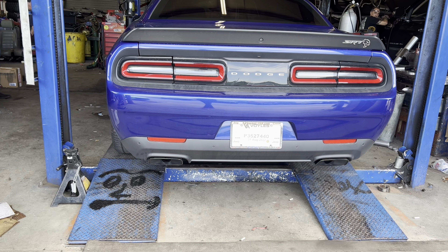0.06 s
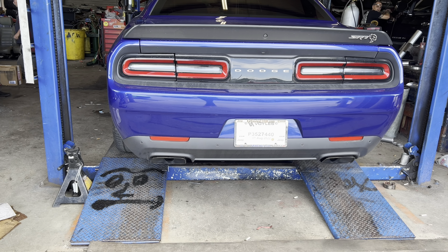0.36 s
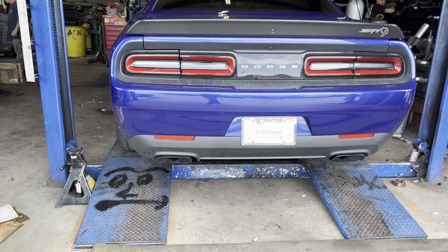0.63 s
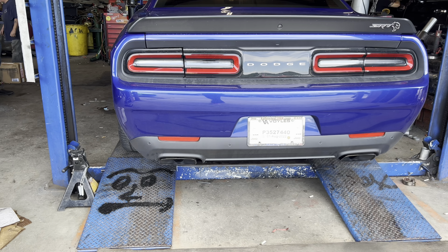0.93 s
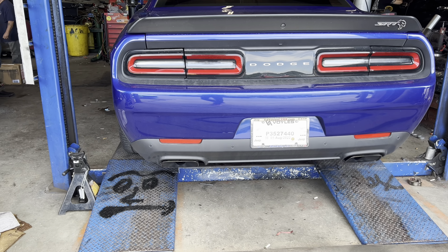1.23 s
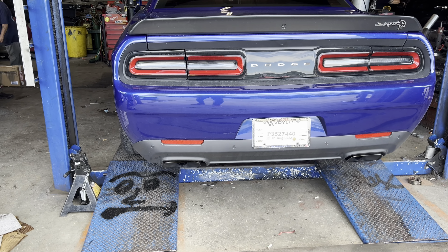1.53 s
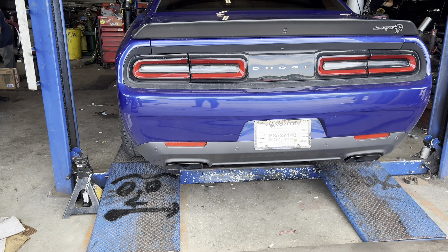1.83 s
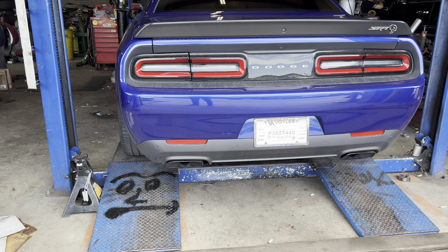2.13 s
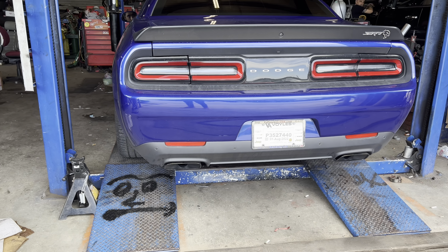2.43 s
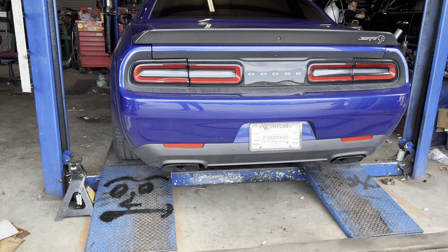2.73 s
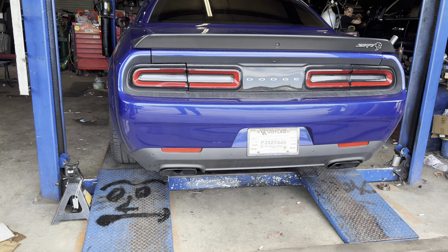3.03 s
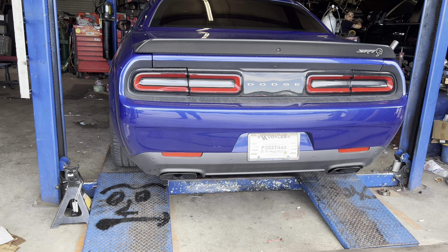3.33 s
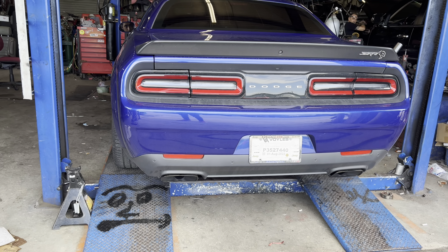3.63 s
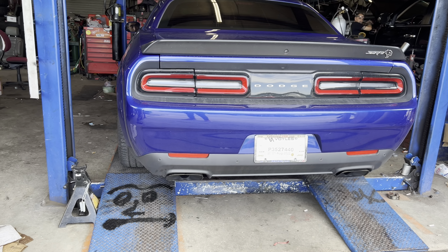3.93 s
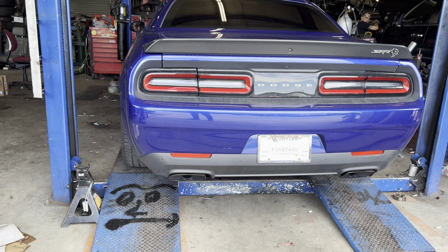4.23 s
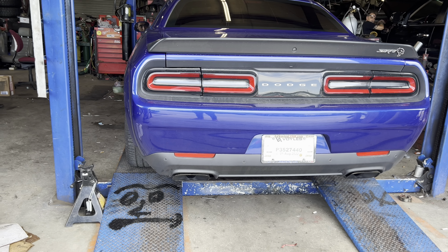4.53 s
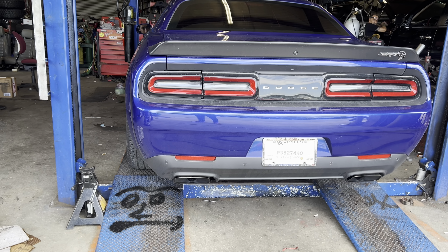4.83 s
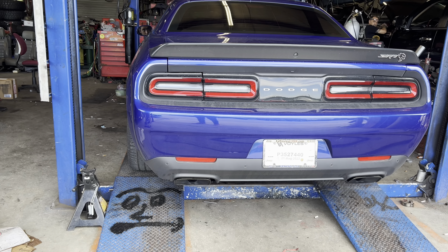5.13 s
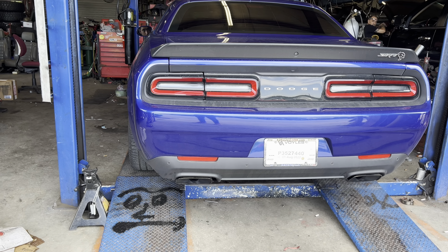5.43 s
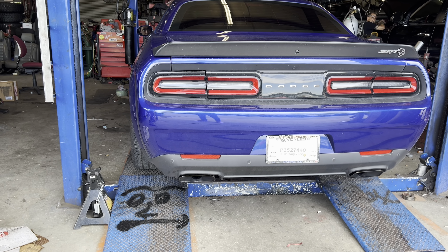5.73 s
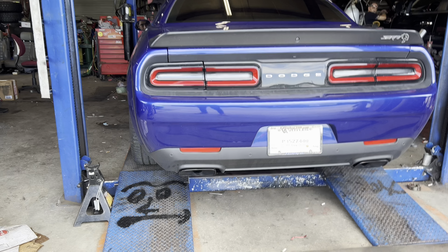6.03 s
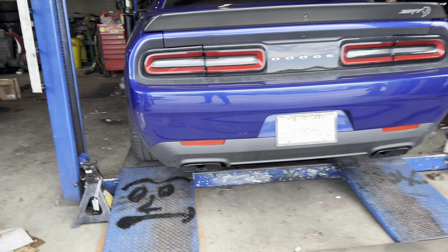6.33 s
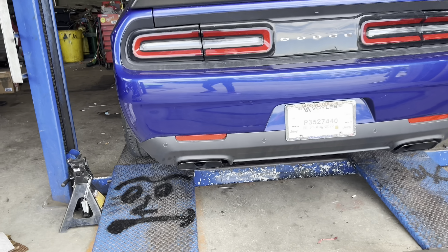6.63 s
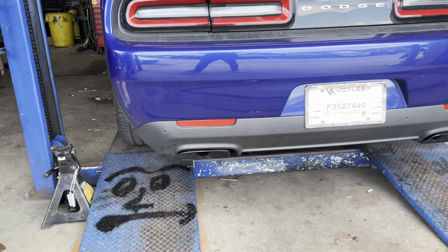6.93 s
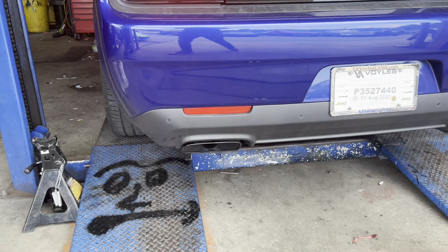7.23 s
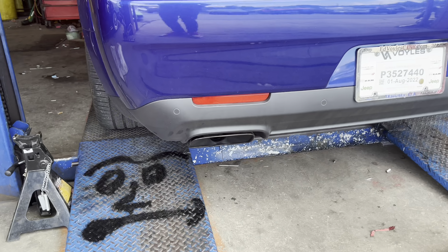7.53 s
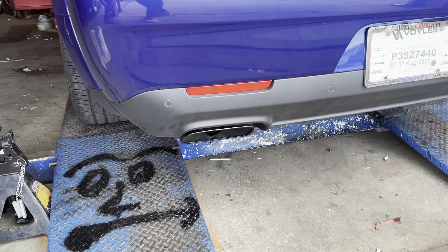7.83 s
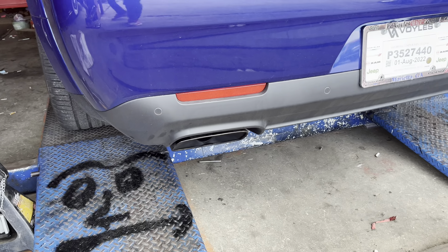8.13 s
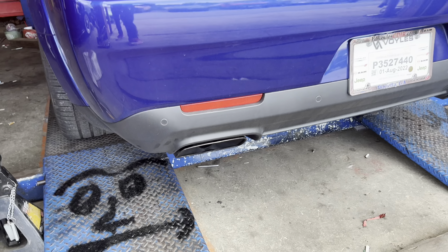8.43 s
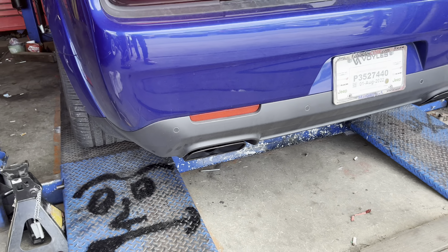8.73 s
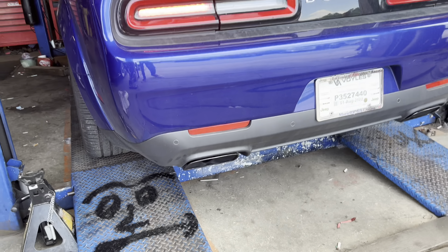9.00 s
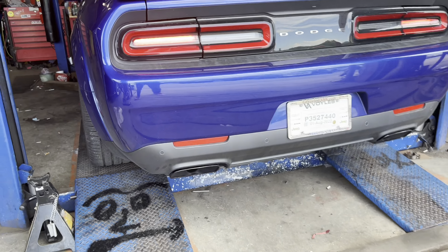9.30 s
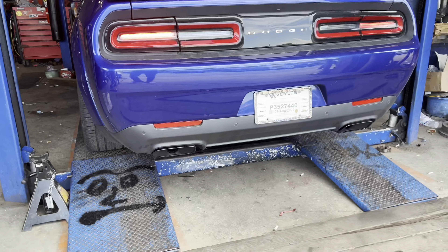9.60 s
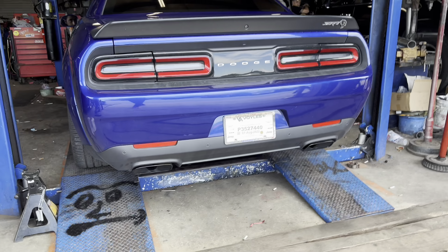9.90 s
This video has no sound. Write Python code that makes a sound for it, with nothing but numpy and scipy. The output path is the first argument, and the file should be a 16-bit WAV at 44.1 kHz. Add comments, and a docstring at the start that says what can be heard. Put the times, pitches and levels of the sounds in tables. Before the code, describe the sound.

A supercharged V8 car engine is blipped twice in quick succession, the second rev higher, both with a crackling rasp. The pitch falls slowly, turning choppy for a moment, and settles into a deep, throbbing idle. The microphone, behind the car in an echoing workshop, moves close to a tailpipe, where the chuffing and ticking grow stronger, then backs away as the exhaust gives a few short barks.

```python
"""In a workshop, behind a car on a lift: its supercharged V8 is blipped twice, coasts down and idles.
Each firing sends a pressure wave and a puff of gas down the pipes: the waves boom, the puffs chuff,
bark and tick. Under throttle the waves steepen to a crackling rasp. On the way down the engine runs
for a while on every second cylinder. At idle the listener steps up to a tailpipe and back."""
import sys
import numpy as np
from scipy import signal
from scipy.fft import rfft, irfft
from scipy.io import wavfile
from scipy.ndimage import uniform_filter1d

SR = 44100
rng = np.random.default_rng(int(sys.argv[2]) if len(sys.argv) > 2 else 0)


def master_out(mix):
    """Clip the mix to full scale and print it as 16-bit PCM to the path in sys.argv[1]."""
    frames = np.transpose(np.atleast_2d(mix))
    ceiling = np.clip(frames, -1, 1)
    pcm = np.round(ceiling * 32767).astype(np.int16)
    wavfile.write(sys.argv[1], SR, pcm)


N = 439236
T = np.arange(N) / SR


def amp(db):
    """Decibels to gain."""
    return np.exp(np.asarray(db) * (np.log(10) / 20))


def unit_rms(x):
    """Scales to rms 1."""
    return x / np.sqrt(np.mean(x ** 2) + 1e-20)


def levelled(x, seconds):
    """Rides the gain to hold the running rms at 1."""
    size = int(seconds * SR)
    power = uniform_filter1d(uniform_filter1d(x ** 2, size), size)
    return x / np.sqrt(abs(power) + 1e-12)


def automation(table):
    """Each column of a time table at every sample."""
    s, *columns = np.transpose(table)
    return [np.interp(T, s, column) for column in columns]


def at_pitch(table, hz):
    """Reads a table on a log-frequency axis."""
    f, value = np.transpose(table)
    return np.interp(np.log(hz + 1), np.log(f), value)


def clicks(at, sizes):
    """One click at each sample index."""
    return np.bincount(np.clip(at, 0, N - 1).astype(int), sizes, N)


def smeared(x, seconds, size=4096):
    """Bends and baffles spread a sharp front over a few milliseconds, leaving its colour alone."""
    spread = np.fft.fft(rng.standard_normal(size) * np.exp(-np.arange(size) / SR / seconds))
    allpass = spread / np.exp(np.conj(signal.hilbert(np.log(abs(spread) + 1e-9))))
    return signal.oaconvolve(x, np.fft.ifft(allpass).real[:size // 2])[:N]


# The exhaust's resonances. Each row: centre in Hz, width in Hz, boost in dB at full ring.
PIPE_MODES = [(54, 20, 9), (145.1, 41, 15.5), (255.5, 44.6, 16.5), (348.8, 8.6, 13), (484.1, 26.3, 15),
              (542.5, 9.6, 7), (606, 15, 7.5), (687, 10, 11.5), (753, 7, 12.5), (886, 180, 4.5),
              (1010, 16, 10), (1128, 8, 15), (1373, 32, 18.5), (1760, 4.7, 4.5), (1880, 7.4, 4.5),
              (2056, 200, 7), (2360, 36, 7.5), (2473, 24, 11), (2610, 46, 5), (3070, 27, 14.5),
              (3430, 120, 11)]

def colour(x, spectrum, ring=0, band=None, size=8192):
    """Minimum-phase EQ: a spectrum, the pipe resonances to the depth ring, and an optional band in Hz."""
    hz = np.fft.rfftfreq(size, 1 / SR)
    modes_db = sum(boost / (1 + (2 * (hz - f) / width) ** 2) for f, width, boost in PIPE_MODES)
    db = at_pitch(spectrum, hz) + ring * modes_db
    if band:
        db -= 10 * np.log10(1 + (band[0] / (hz + 1)) ** 12 + (hz / band[1]) ** 12)
    log_gain = np.log(amp(np.maximum(db, -90)))
    response = np.exp(np.conj(signal.hilbert(np.r_[log_gain, log_gain[-2:0:-1]])))
    return signal.oaconvolve(x, np.fft.ifft(response).real[:size // 2])[:N]


# Stabs of the throttle. Each row: times in seconds when it opens, the pipes are charged and it shuts,
# opening and closing times in seconds, first rasp in dB, full rasp in dB, steepening in dB.
THROTTLE_BLIPS = [(0, 0.228, 0.26, 0.19, 0.12, -40, -22, 8),
                  (0.497, 0.656, 0.8186, 0.03, 0.034, -23.5, -15, 27)]

def blip(opens, full, shuts, opening_s, closing_s):
    """One stab: how far the throttle is open and how far the pipes are charged, both 0-1."""
    opening = np.clip((T - opens) / opening_s, 0, 1) * np.exp(-np.maximum(T - shuts, 0) / closing_s)
    charge = np.clip((T - opens) / (full - opens), 0, 1)
    return opening, charge


# The rev curve. Each row: time in seconds, firings per second.
REVS = [(0.0, 46.0), (0.18, 97.6), (0.33, 139.3), (0.48, 145.6), (0.81, 276.0), (1.04, 260.0),
        (1.26, 217.63), (1.7, 176.71), (2.0, 144.48), (2.2, 130.77), (2.75, 116.76), (3.35, 105.4),
        (3.66, 93.69), (3.82, 88.39), (4.2, 75.53), (4.55, 55.48), (4.8, 53.2), (5.1, 53.17), (5.4, 51.2),
        (5.7, 50.65), (6.25, 52.39), (7.1, 51.73), (7.8, 50.5), (8.55, 50.67), (9.05, 48.48), (9.5, 49.11),
        (9.96, 49.5)]
# The walk to the tailpipe and back. Each row: time in seconds, distance in metres.
WALK = [(5.4, 1.61), (6.4, 1.57), (6.9, 1.22), (7.3, 1.045), (8.15, 0.73), (8.6, .98), (9.1, 0.97),
        (9.96, 1.7)]
# The stretch on four cylinders, all in seconds: start, end, time to drop four, time to take them back.
FOUR_CYLINDER_SPELL = (2.17, 3.483, 0.066, 0.58)
FAR_M = 2.4  # the distance where closeness is 1

def controls():
    """The state: firing rate, throttle opening, share of running on four, listener's closeness."""
    rate, = automation(REVS)
    distance, = automation(WALK)
    throttle = sum(blip(*row[:5])[0] for row in THROTTLE_BLIPS)
    starts, ends, drop, back = FOUR_CYLINDER_SPELL
    on_four = np.clip((T - starts) / drop, 0, 1) - np.clip((T - ends) / back, 0, 1)
    return rate, throttle, on_four, FAR_M / distance


# The mix, by layer. Each row: base level in dB at idle from afar, dB per doubling of speed,
# dB added by open throttle, dB added on four cylinders, power of closeness, weight of effort.
MIX = {"quarter": (-87.5, 25.5, 14, -7, -2.5, 0), "half": (-42.5, -7, -18, 5.5, 2.5, 0.5),
       "firing": (-29, -1.5, 1, -10.5, .5, 1), "octave": (-34.5, -9, 9, -3, 0.5838, 1.41),
       "lope": (-48, 6, 2.5, 6, 0.18, 1.2), "thump": (-53.5, 5, -4.5, 1.5, 0.5, 2.15),
       "chuff": (-66, 11, 6, -1, 1.78, 1.6), "bark": (-56, 4, 5, -1.5, 1.1, 2),
       "chatter": (-54.5, 0, 0, -2.5, 0, -5), "tick": (-65.5, 2.5, -4.5, -2.5, 0.72, 1.84),
       "hiss": (-69.5, 1, 6, -4, 0.73, 0.66)}

def fader(layer, state, effort_db, idle_rate=50):
    """A layer's gain in dB, from speed, throttle, working cylinders, closeness and effort."""
    rate, throttle, on_four, closeness = state
    idle_db, speed_db, open_db, four_db, power, weight = MIX[layer]
    engine_db = idle_db + speed_db * np.log2(rate / idle_rate) + open_db * throttle + four_db * on_four
    return engine_db + power * 20 * np.log10(closeness) + weight * effort_db


# Each cylinder's voice, in firing order. Each row: extra push, extra push when on four,
# then accents in dB for chuff, low bark, high bark, tick and chatter.
CYLINDER_VOICES = [(1.1, 1.3, -2, -1, 5, 0, -5), (-.3, -.5, 0, -9, 0, 1, -30), (.1, .3, 3, -9, 0, 2, -3),
                   (-.7, -.8, 2, -6, -8, -2, -30), (-.1, .95, 0, 2, -5, -2, -3),
                   (.4, -.5, -2, 6, -9, 2, -30), (-1, .4, -3, 4, -9, 1, 1), (.5, -.4, -1, -3, 5, -2, -30)]

def firings(turns):
    """Sample index and cylinder of every firing; turns counts up by one per firing."""
    at = np.flatnonzero(np.diff(np.floor(turns)) > 0) + 1
    return at, np.floor(turns[at]).astype(int) % len(CYLINDER_VOICES)


# The hall's decay. Each row: frequency in Hz, seconds to fall by 60 dB.
HALL_DECAY = [(100, 1.6), (500, 3), (2000, 2.5), (5000, 1.9), (10000, 0.58), (16000, .45)]

def hall_tail(seconds, onset_s):
    """Reflections for two ears, each band dying at its own speed, with equal energy at every pitch."""
    hz, t, bands = signal.stft(rng.standard_normal((2, int(seconds * SR))), SR, nperseg=256)
    fade = amp(-60 * t / at_pitch(HALL_DECAY, hz)[:, None]) * (1 - np.exp(-t / onset_s))
    tail = signal.istft(bands * fade / np.linalg.norm(fade, axis=1, keepdims=True), SR, nperseg=256)[1]
    return tail / np.linalg.norm(tail[0])


# How dry the exhaust arrives. Each row: frequency in Hz, share that comes straight.
DIRECT_SHARE = [(60, 0.33), (130, 0.88), (290, 0.74), (640, 0.17), (1400, 0.16), (3100, 0.074),
                (7000, 0.052), (15000, .1)]
# Its lean in the stereo image. Each row: frequency in Hz, left minus right in dB.
PAN = [(200, 0), (700, -1.3), (1300, -.3), (2400, 1), (4400, 4.5), (7000, 4), (10000, .5)]

def workshop(x, lead_s=0.00036, near_s=0.02, tail_db=-15, size=4096):
    """Straight sound, quick reflections off the car and the lift, and the long tail of the hall."""
    hz, t = np.fft.rfftfreq(size, 1 / SR), np.arange(size) / SR
    near = rfft(rng.standard_normal(size) * np.exp(-t / near_s))
    near /= np.sqrt(uniform_filter1d(abs(near) ** 2, size=15))
    direct = np.clip(at_pitch(DIRECT_SHARE, hz), 0, 1)
    # reflections from the sides reach the two ears in opposite phase
    side = near * np.sqrt((1 - direct) / (1 + direct))
    # long waves reach both ears equally loud, the left a little earlier
    treble = hz ** 4 / (hz ** 4 + 600 ** 4)
    side = treble * side + (1 - treble) * 1j * np.pi * hz * lead_s
    tilt = amp(at_pitch(PAN, hz) / 2)
    pad = size // 8
    ears = np.roll(irfft(np.array([(1 + side) * tilt, (1 - side) / tilt])), pad, axis=1)
    close = signal.oaconvolve(x[None], ears, axes=1)[:, pad:pad + N]
    # the bass stays out of the hall's echo, dry and centred
    send = signal.sosfilt(signal.butter(2, 300, "high", fs=SR, output="sos"), x)
    hall = signal.oaconvolve(send[None], hall_tail(seconds=1.6, onset_s=0.0036), axes=1)[:, :N]
    return close + amp(tail_db) * hall


# Short rushes of air. Each row: time of the peak in seconds, level in dB.
AIR_RUSHES = [(.87, -46), (9.459, -52)]
# The tone of the hiss. Each row: frequency in Hz, gain in dB.
HISS_EQ = [(2200, -20), (3400, 8.5), (4500, 10), (6300, 9.5), (7500, 4.5), (9000, 0), (12000, -4),
           (15500, -9.5)]

def hiss(state, flow_db, rise_s=0.1, fall_s=.11):
    """A bed of hiss that follows the gas flow and swells briefly with each rush of air."""
    rushes = sum(amp(db) * np.exp(-np.maximum((s - T) / rise_s, (T - s) / fall_s))
                 for s, db in AIR_RUSHES)
    air = unit_rms(colour(rng.standard_normal(N), HISS_EQ))
    return np.hypot(amp(fader("hiss", state, flow_db)), rushes) * air


# The swirl inside a puff. Each row: frequency in Hz, gain in dB.
SWIRL_EQ = [(300, 3), (420, -3), (650, -2), (850, -3), (1250, -15), (1700, -14.5), (2300, -8.5),
            (2900, -17.5), (3600, -15)]

def puff(turns, cylinder_db, band, ring_hz, ping, delay, length, between,
         scatter_db=2, wander=0.088, merge_hz=105, ring=0.79):
    """Each firing lets out a burst that rings the pipe; at speed the bursts merge into a steady flow.
    ping is a burst's pitched share, between the flow in the gaps; delay and length count in firings."""
    firing, age = np.divmod(turns - delay + len(CYLINDER_VOICES), 1)
    firing = firing.astype(int)
    luck, detune = rng.standard_normal((2048, 2)).T
    size = amp(np.resize(cylinder_db, len(luck)) + scatter_db * luck)[firing]
    flow = between + (np.gradient(turns) * SR / merge_hz) ** 4 / 2
    burst = size * age / length * np.exp(1 - age / length)
    swirl = levelled(colour(rng.standard_normal(N), SWIRL_EQ, band=band), 0.0031)
    note_hz = ring_hz * (1 + wander * detune)[firing]
    note = np.sqrt(2) * np.cos(2 * np.pi * np.cumsum(note_hz) / SR)
    jet = flow * swirl + burst * (np.sqrt(1 - ping) * swirl + np.sqrt(ping) * note)
    return levelled(colour(jet, [(20, 0), (20000, 0)], ring=ring, band=band), .25)


def gas_puffs(turns, state, flow_db, bounce=0.18, bark_at_s=8.683, barking_cylinder=5):
    """Puffs in several registers, from chuff up to tick, with their bounce off the concrete floor."""
    chuff_db, bark_db, tick_db, chatter_db = (
        fader(layer, state, flow_db) for layer in ("chuff", "bark", "tick", "chatter"))
    # the cylinder with the strongest low bark fires at bark_at_s
    shift = round(np.interp(bark_at_s, T, turns)) - barking_cylinder
    chuff, low_bark, high_bark, tick, chatter = np.roll(CYLINDER_VOICES, shift, axis=0).T[2:]
    on_four, closeness = state[2:]
    bounce_s = .00093 * closeness ** .4
    # the low bark and the upper ring of the tick carry only close to the pipe
    reach_db = np.interp(FAR_M / closeness, [0.78, FAR_M], [0, -7])
    # the tick is strongest where its floor bounce arrives in step
    tick_hz = np.minimum(3 / bounce_s, 2500)
    puffs = amp(chuff_db) * puff(
        turns, chuff, (290, 640), ring_hz=370.4, ping=.39, delay=-.29, length=.37, between=.09)
    puffs += amp(bark_db - 8.5 + reach_db) * puff(
        turns, low_bark, (670, 1000), ring_hz=800, ping=.6, delay=-.4, length=.24, between=.08,
        scatter_db=1.5, wander=.055)
    puffs += amp(bark_db - 10) * puff(
        turns, high_bark, (940, 1220), ring_hz=1080, ping=.55, delay=-.36, length=.28, between=.14,
        wander=.035, ring=.4)
    # a wheeze above the barks is much the same for all cylinders
    puffs += amp(bark_db - 15) * puff(
        turns, tick, (1250, 1650), ring_hz=1390, ping=.2, delay=-.33, length=.25, between=.3,
        scatter_db=3, ring=.5)
    puffs += amp(tick_db) * puff(
        turns, tick, (1800, 3000), ring_hz=tick_hz, ping=.5, delay=-.24, length=.19, between=.08,
        scatter_db=3, wander=.05, ring=.35)
    puffs += amp(tick_db - 6 + reach_db) * puff(
        turns, tick, (2600, 3200), ring_hz=np.minimum(1.29 * tick_hz, 3060), ping=.5, delay=-.24,
        length=.2, between=.12, scatter_db=3.6, wander=.035, ring=.2)
    # on four cylinders the few firings stay apart and chatter
    puffs += on_four * amp(chatter_db) * puff(
        turns, chatter, (900, 1500), ring_hz=1080, ping=.4, delay=.51, length=.3, between=.2,
        merge_hz=400, ring=.45)
    return (puffs + bounce * np.interp(T - bounce_s, T, puffs)) / np.hypot(1, bounce)


# The tones of the lope and of the thump. Each row: frequency in Hz, gain in dB.
LOPE_EQ = [(20, -39.5), (40, -1), (62, 1), (100, 14), (170, 6), (215, 8), (290, -6.5), (345, -8),
           (420, -19), (600, -19), (800, -31.5), (1500, -59)]
THUMP_EQ = [(100, -8), (148, 3), (200, 4), (250, -6), (300, -1), (345, -9.5), (395, -10), (445, 1.5),
            (490, -13.5), (600, -29.5), (900, -43)]

def lope(turns, state, flow_db, scatter_shut=.15, scatter_open=.9, thump_scatter_db=2):
    """Unequal cylinders fill the gaps between the firing tones; each working one thumps the pipes."""
    at, cylinder = firings(turns)
    _, throttle, on_four, _ = (control[at] for control in state)
    scatter = scatter_shut + (scatter_open - scatter_shut) * throttle
    eight, four = np.array(CYLINDER_VOICES)[cylinder, :2].T
    push = (1 - on_four) * eight + on_four * four + scatter * rng.standard_normal(len(at))
    working = 1 - on_four + on_four * np.maximum(four, 0)
    strength = working * amp(thump_scatter_db * rng.standard_normal(len(at)))
    thumps = levelled(colour(clicks(at, strength), THUMP_EQ, ring=0.95, band=(125, 900)), 0.17)
    uneven = levelled(colour(clicks(at, push), LOPE_EQ, ring=0.78), 0.091)
    return amp(fader("lope", state, flow_db)) * uneven + amp(fader("thump", state, flow_db)) * thumps


# Lumps on the overrun. Each row: start in seconds, level in dB.
OVERRUN_LUMPS = [(0.869, -21), (3.613, -32), (3.649, -34), (3.675, -28), (4.115, -35), (4.25, -33),
                 (4.329, -36)]

def lumps():
    """One cylinder fires much harder and thuds down the pipes."""
    s, db = np.transpose(OVERRUN_LUMPS)
    thuds = colour(clicks(s * SR, amp(db)), LOPE_EQ, ring=1, band=(40, 300))
    return amp(db.max()) * thuds / abs(thuds).max()


# Single hard barks. Each row: start in seconds, pitch in Hz, peak in dB before the trim.
TAILPIPE_BARKS = [(0.044, 920, -23.5), (9.318, 858, -24), (9.338, 780, -27), (9.398, 890, -26),
                  (9.48, 837, -33), (9.5, 794, -23.5), (9.559, 885, -25.5), (9.722, 1060, -30),
                  (9.885, 1030, -24.5)]

def barks(rise_s=0.0022, decay_s=0.0046, rough=0.29, trim_db=-3):
    """A hard puff makes the tailpipe ring briefly."""
    t, out = np.arange(0, .08, 1 / SR), np.zeros(N)
    envelope = (1 - np.exp(-t / rise_s)) * np.exp(-t / decay_s)
    for s, hz, db in TAILPIPE_BARKS:
        flutter = unit_rms(uniform_filter1d(rng.standard_normal(len(t)), size=100))
        ring = envelope * (1 + rough * flutter) * np.sin(2 * np.pi * hz * t)
        out += amp(db + trim_db) * np.interp(T - s, t, ring / abs(ring).max(), 0, 0)
    return out


# Sharp cracks in the pipes. Each row: start in seconds, level in dB, snap in dB, both before the trims.
PIPE_CRACKS = [(.033, -27.5, -53), (.062, -25.5, -61), (.102, -16.5, -38), (.152, -22, -35.5),
               (.142, -29, -44), (.162, -14, -41), (.194, -5, -42), (.213, -12.5, -22), (.232, -11.5, -27),
               (.221, -12.5, -30), (0.2397, -1, -10.5), (.264, -14, -57), (.302, -16.5, -46),
               (.324, -12.5, -49), (.379, -28.5, -52), (0.512, -8, -37), (.536, -6.5, -36),
               (.559, -5.5, -29), (.581, -3, -14), (0.6023, -1.5, -4.5), (.622, -4.5, -14),
               (.733, -8.5, -17.5)]
# The tone of a crack, and the treble of snap and sizzle. Each row: frequency in Hz, gain in dB.
CRACK_EQ = [(200, -13), (600, 20.5), (1400, -7), (1900, 12.5), (2200, 9.5), (2650, 13.5), (2950, -2),
            (3600, 0), (4500, -14), (7000, -41), (15000, -56)]
SIZZLE_EQ = [(2200, -14), (3500, 3.5), (4500, 3), (6200, 4.5), (7200, -0.5), (9000, -7), (12000, -6.5),
             (15500, -14.5)]

def cracks(trim_db=-2, snap_trim_db=-5, spread_s=0.0035, snap_spread_s=0.0059):
    """The hardest shocks stand out as cracks, some with a snap far up the treble."""
    s, db, snap_db = np.transpose(PIPE_CRACKS)
    ringing = colour(smeared(clicks(s * SR, amp(db)), spread_s), CRACK_EQ, ring=0.83)
    snap = colour(smeared(clicks(s * SR, amp(snap_db)), snap_spread_s), SIZZLE_EQ)
    return (amp(db.max() + trim_db) * ringing / abs(ringing).max()
            + amp(snap_db.max() + snap_trim_db) * snap / abs(snap).max())


def rasp_envelopes(sag_db_per_s=36.5, sizzle_db=-36):
    """Body and sizzle gains: the waves steepen as a stab charges the pipes, then the rasp eases."""
    body, sizzle = 0, 0
    for opens, full, shuts, opening_s, closing_s, first_db, full_db, steep_db in THROTTLE_BLIPS:
        opening, charge = blip(opens, full, shuts, opening_s, closing_s)
        sag_db = sag_db_per_s * np.maximum(T - full, 0)
        gain = opening * amp(first_db + (full_db - first_db) * charge - sag_db)
        body += gain
        sizzle += gain * amp(sizzle_db + steep_db * charge ** 1.1 * opening ** .5)
    return body, sizzle


# The tones of the rasp's body and of the clattering steel. Each row: frequency in Hz, gain in dB.
RASP_EQ = [(40, 12.5), (150, 6.5), (300, -12), (450, 1), (700, 0.5), (1100, 1.5), (1250, 1.5), (1700, 2),
           (2600, -3), (3100, -11.5), (3800, -14), (5000, -17.5), (9000, -90)]
CLATTER_EQ = [(500, -41), (900, 17), (1200, -16), (1500, -29), (1850, -1), (2200, 1), (2650, 1.5),
              (2900, -7), (3500, -22), (4200, -30), (8000, -40)]

def rasp(turns, throttle, clatter_db=-36, turbulence=.55, spread_s=.006, jitter_s=.00018):
    """Under throttle each firing arrives as a shock, followed by a jet of gas, and the steel clatters."""
    body_gain, sizzle_gain = rasp_envelopes()
    at, cylinder = firings(turns)
    size, slip, knock = rng.standard_normal((len(at), 3)).T
    shock_db = 2.5 * size + 4 * np.array(CYLINDER_VOICES)[cylinder, 0]
    shocks = clicks(at + jitter_s * SR * slip, amp(shock_db))
    jet = unit_rms((0.38 + np.exp(-(turns % 1))) * rng.standard_normal(N))
    drive = smeared(levelled(shocks, 0.091), spread_s) + turbulence * jet
    body = levelled(colour(drive, RASP_EQ, ring=0.74, band=(45, 12000)), 0.025)
    sizzle = levelled(colour(drive + jet, SIZZLE_EQ), 0.03)
    knocks = smeared(clicks(at, amp(5 * knock)), spread_s)
    clatter = levelled(colour(knocks, CLATTER_EQ, ring=0.9), .08)
    return body_gain * body + sizzle_gain * sizzle + throttle * amp(clatter_db) * clatter


# How well pipes and bay carry a pure tone. Each row: frequency in Hz, gain in dB.
TONE_CARRY = [(25.0, -41), (44.0, -3), (53.0, -0.5), (62.0, -5), (80.0, -8.5), (98.0, -0.3), (109.0, 2.5),
              (124.0, -4.5), (143.0, -0.5), (156.0, 0.5), (169.0, -0.5), (183.0, -17), (225.0, -5),
              (243.0, -5), (256.0, 2.5), (275.0, 0.5), (292.0, -5), (340.0, -9.5), (560.0, 8)]

def boom(turns, state, pressure_db, lead_s=0.000089, lumpy_from_s=9.0, sag_depth=0.54):
    """The clean pressure wave of the firings, its octave and the slower throbs of unequal cylinders."""
    count = np.arange(-2, 1400)
    push = 1 + .035 * np.interp(turns, count, rng.standard_normal(len(count)))
    # from lumpy_from_s on, the firing tone sags once in every engine cycle
    cycles = (turns - np.interp(lumpy_from_s, T, turns)) / len(CYLINDER_VOICES)
    sag = 1 - sag_depth * (cycles > -.5) * np.cos(np.pi * cycles) ** 4
    tones = 0
    for layer, multiple, phase, size in [("quarter", .25, 0, 1), ("half", .5, 0, 1),
                                         ("firing", 1, 0, sag), ("octave", 2, 0.88, 1)]:
        db = fader(layer, state, pressure_db) + at_pitch(TONE_CARRY, multiple * state[0])
        tones += size * amp(db) * np.cos(2 * np.pi * multiple * turns + phase)
    wave = np.sqrt(2) * push * tones
    # the wave reaches the left ear first
    return np.array([np.interp(T + side * lead_s / 2, T, wave) for side in (1, -1)])


# How hard the cylinders work. Each row: time in seconds, relative pressure in dB, relative flow in dB.
ENGINE_EFFORT = [(0.0, 0.5, 4.5), (0.04, 1.5, 5), (0.07, 4, 10.5), (0.25, 9.5, 8.5), (0.45, 11.5, 8.5),
                 (0.7, 9.5, 3), (0.8, 6.5, 5), (0.87, 0, -5), (1.04, 6.5, 2.5), (1.6, -9.5, -1),
                 (2.0, 5, -0.5), (2.17, 4, -0.5), (2.26, 6.5, 0.5), (2.6, 7, -0.5), (3.15, 6, -0.5),
                 (3.7, -1.5, 0.5), (4.1, -9, -2.5), (4.5, -4.5, -1.5), (4.8, -3.5, 0.5), (5.5, -4.5, 1.5),
                 (6.3, -1, 3), (8.5, 1.5, 4), (9.1, 0.5, 5), (9.96, 4, 8)]

def scene():
    """One crankshaft drives the running layers; the boom stays dry, the rest sounds in the workshop."""
    state = controls()
    rate, throttle = state[:2]
    pressure_db, flow_db = automation(ENGINE_EFFORT)
    turns = np.cumsum(rate) / SR - .16
    exhaust = lope(turns, state, flow_db) + gas_puffs(turns, state, flow_db) + hiss(state, flow_db)
    exhaust += rasp(turns, throttle) + cracks() + barks() + lumps()
    return boom(turns, state, pressure_db) + workshop(exhaust)


def record(dry, cutoff_hz=15800):
    """Peaks round off near full scale, then a steep low-pass trims the very top."""
    rounded = dry / (1 + dry ** 6) ** (1 / 6)
    lowpass = signal.firwin(511, cutoff_hz, window=("kaiser", 9), fs=SR)
    return signal.oaconvolve(rounded, lowpass[None], "same")


dry = scene()
out = record(dry)
master_out(out)
```